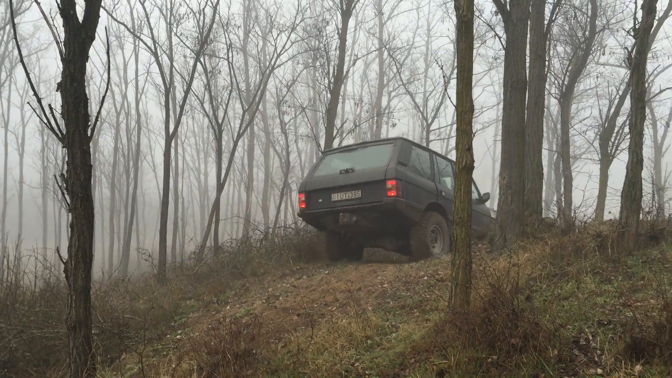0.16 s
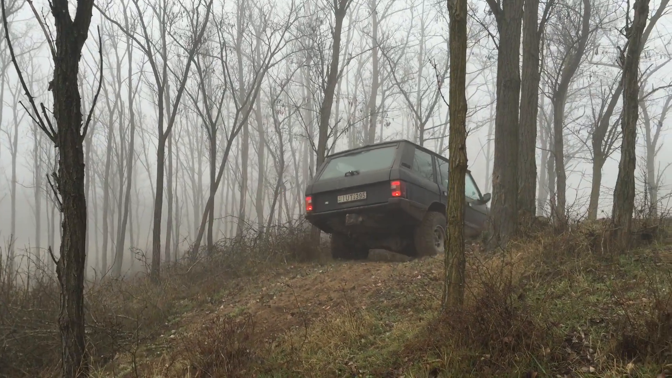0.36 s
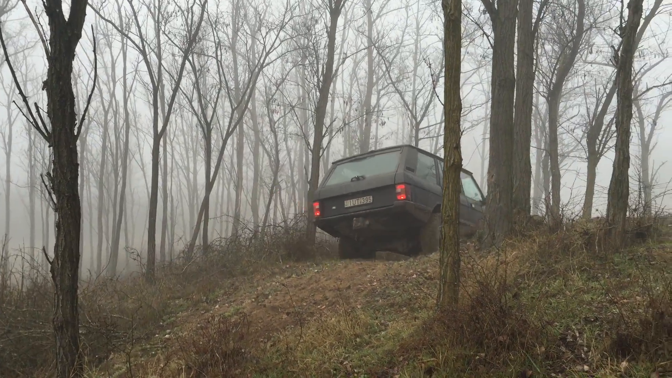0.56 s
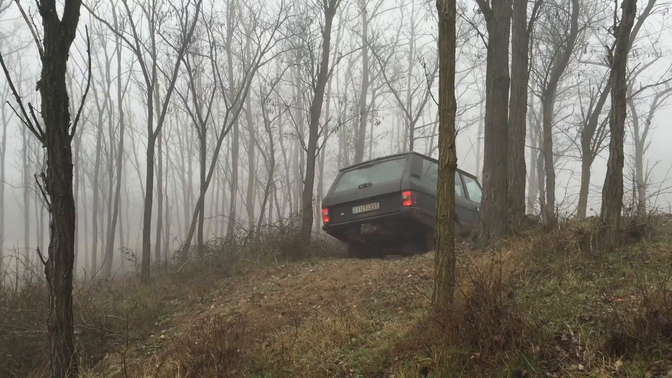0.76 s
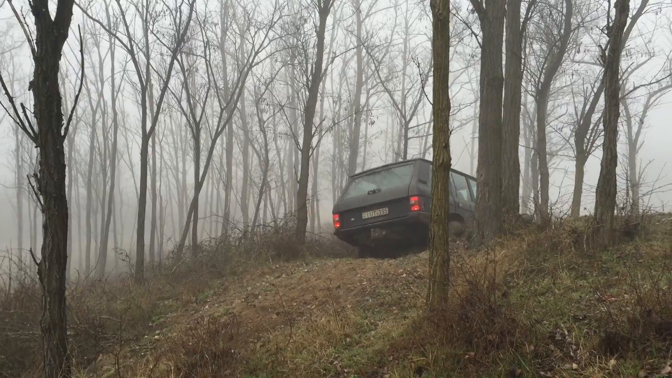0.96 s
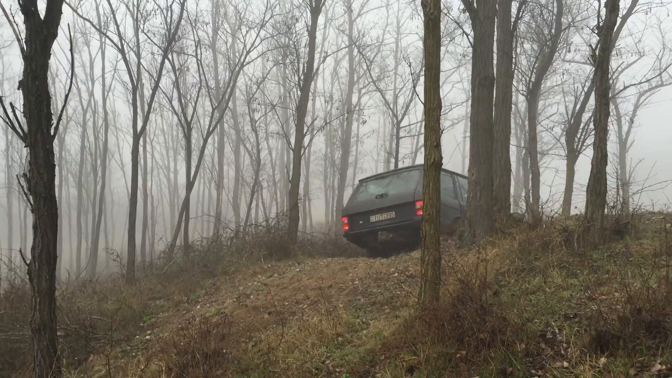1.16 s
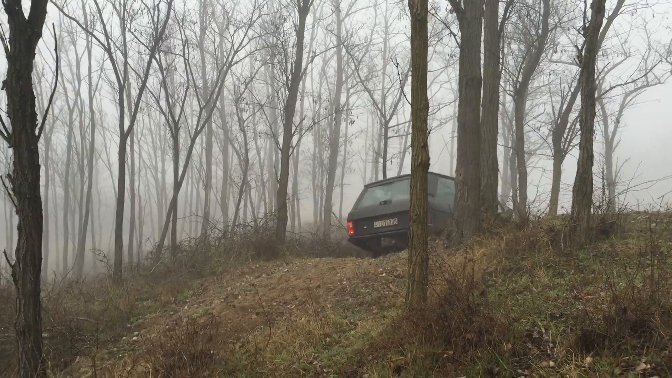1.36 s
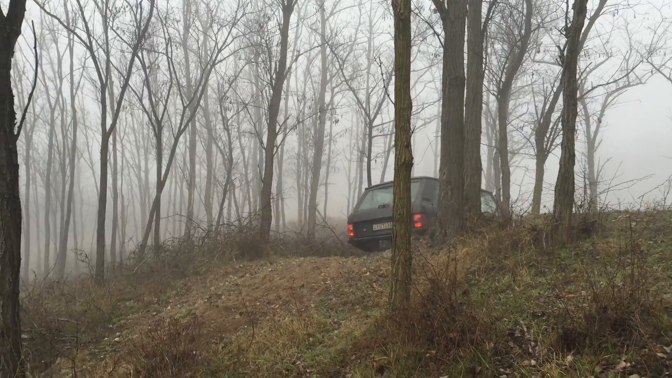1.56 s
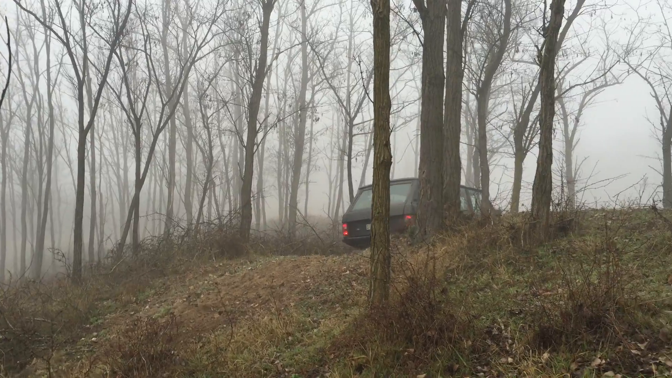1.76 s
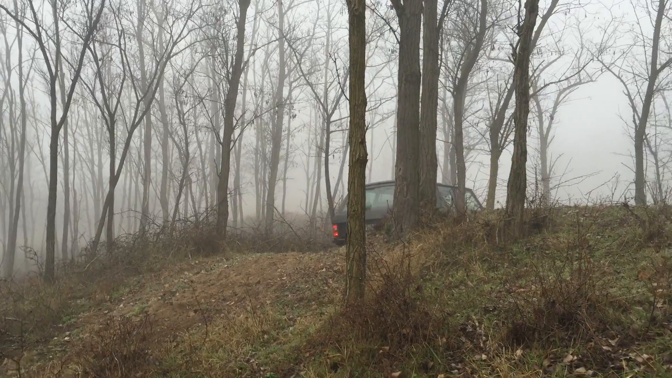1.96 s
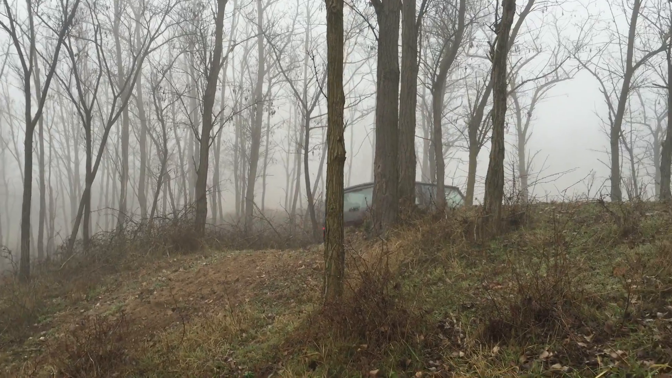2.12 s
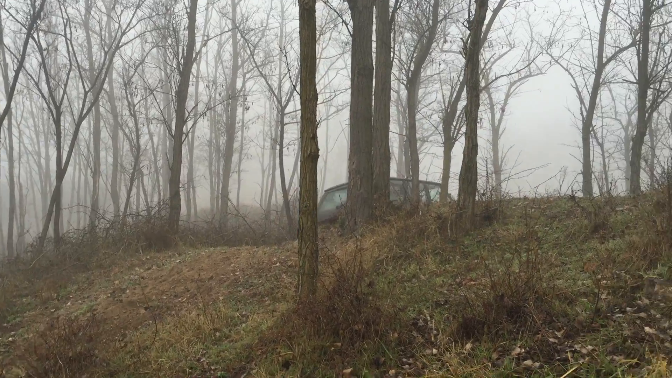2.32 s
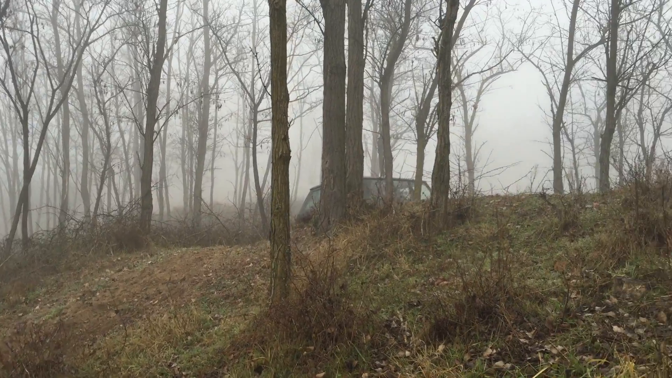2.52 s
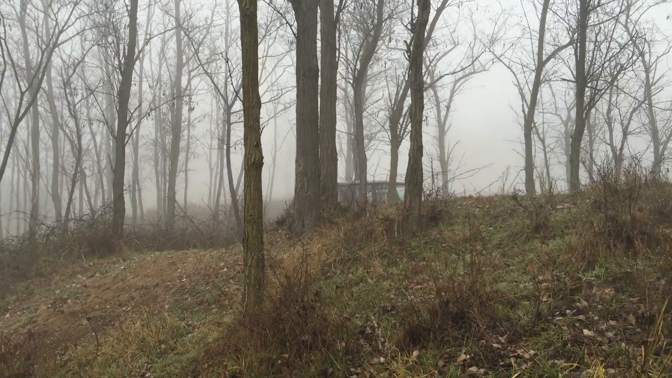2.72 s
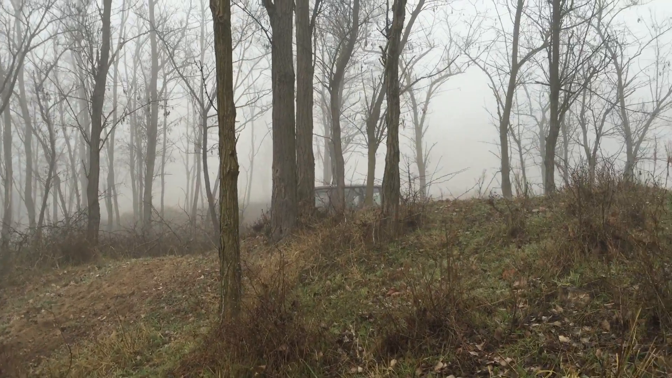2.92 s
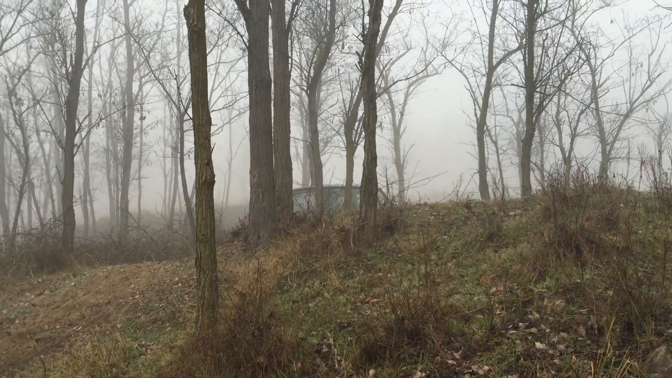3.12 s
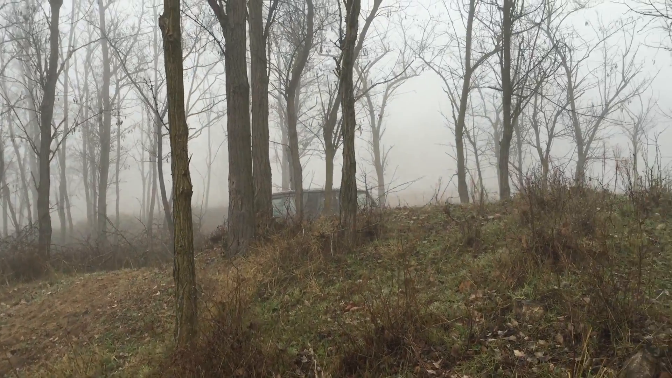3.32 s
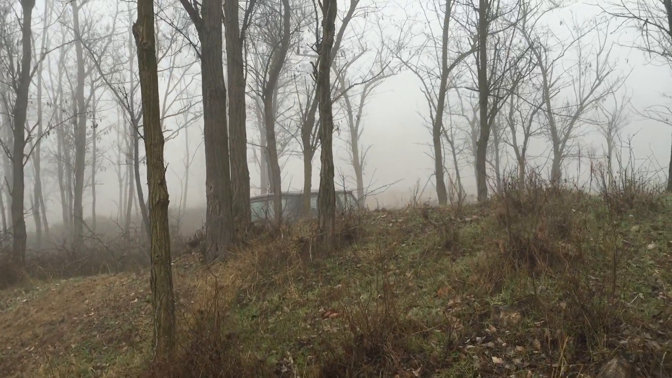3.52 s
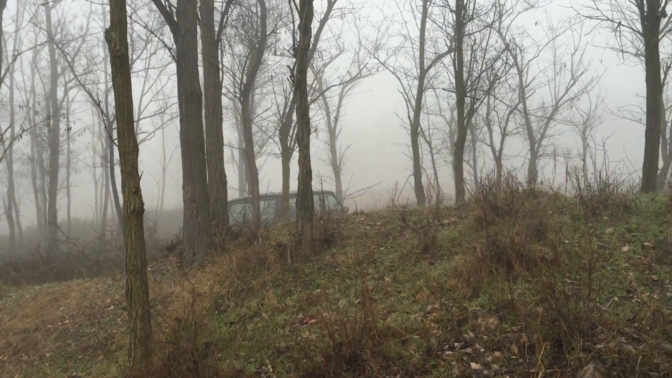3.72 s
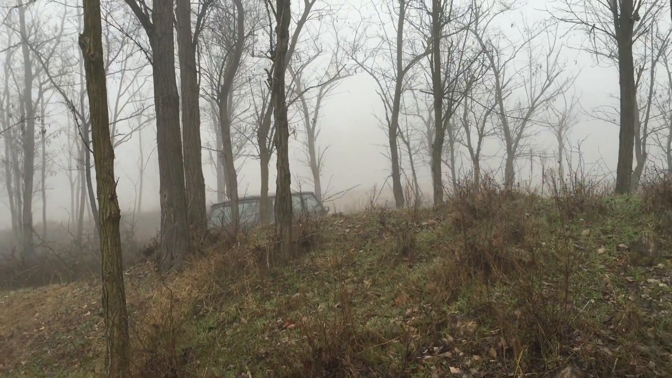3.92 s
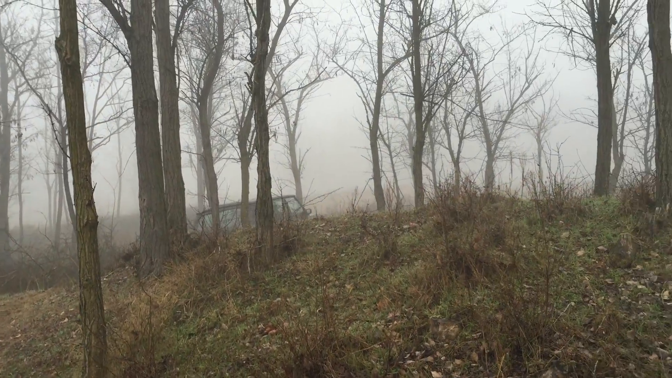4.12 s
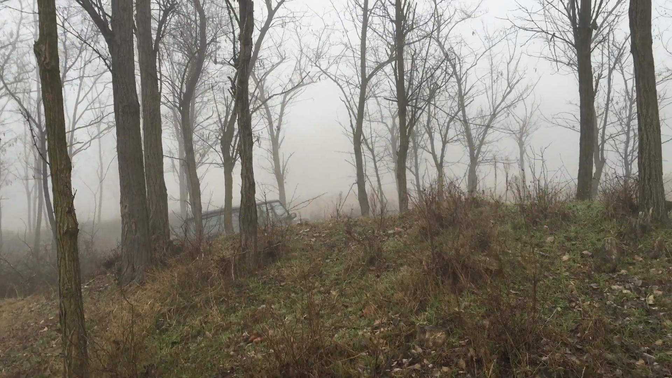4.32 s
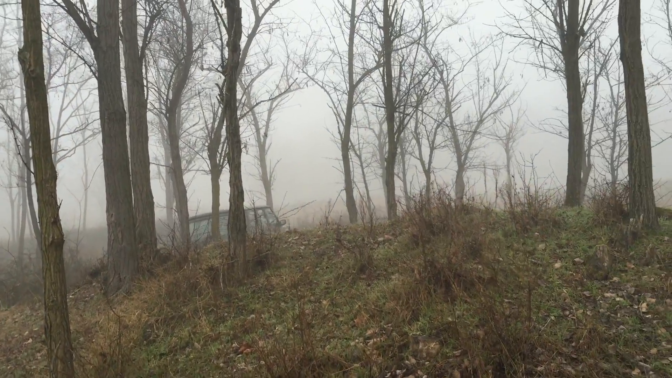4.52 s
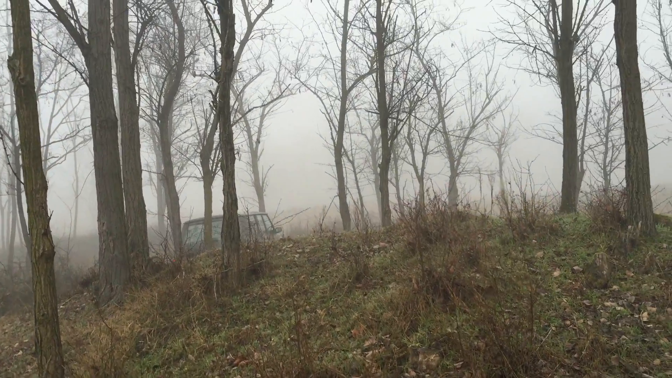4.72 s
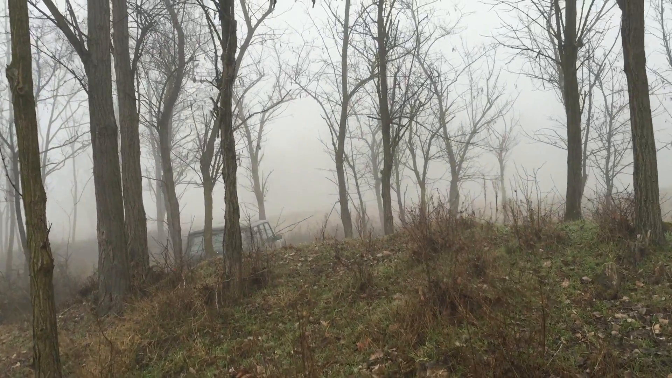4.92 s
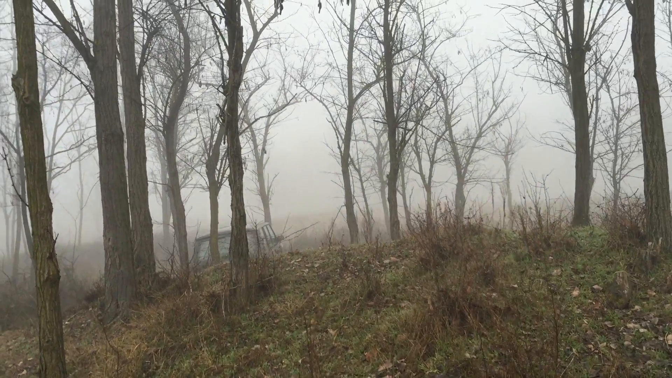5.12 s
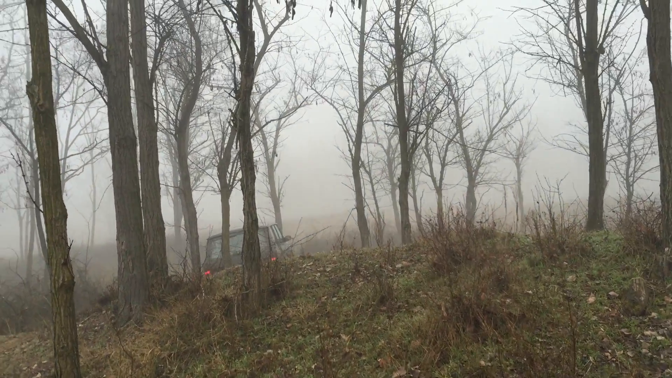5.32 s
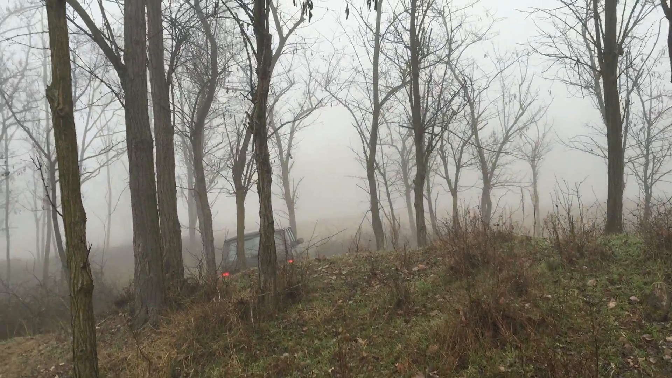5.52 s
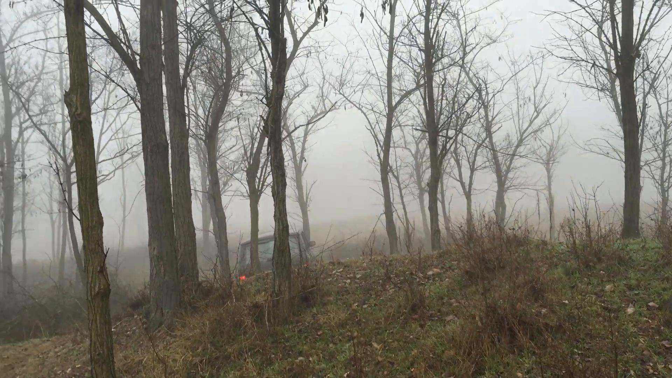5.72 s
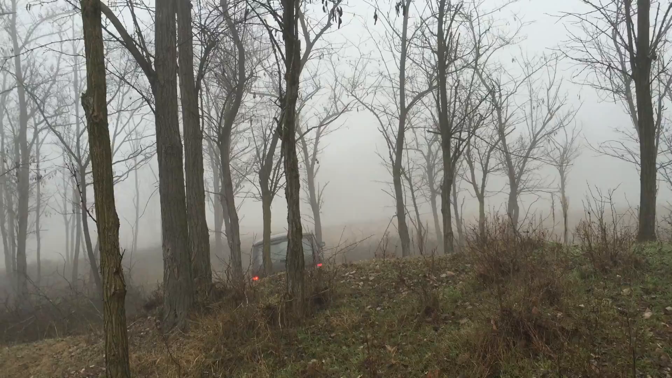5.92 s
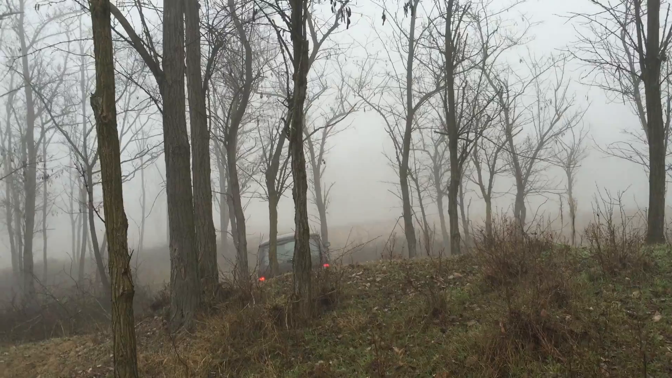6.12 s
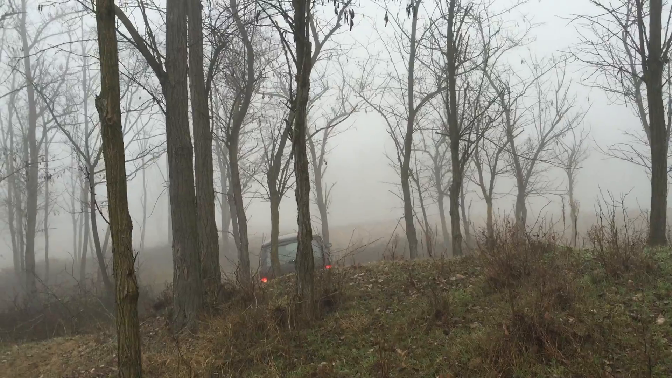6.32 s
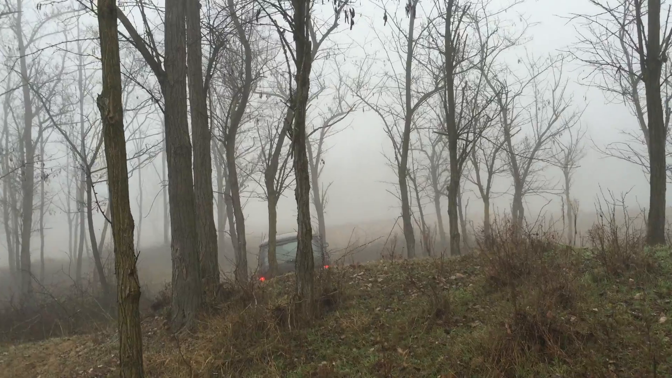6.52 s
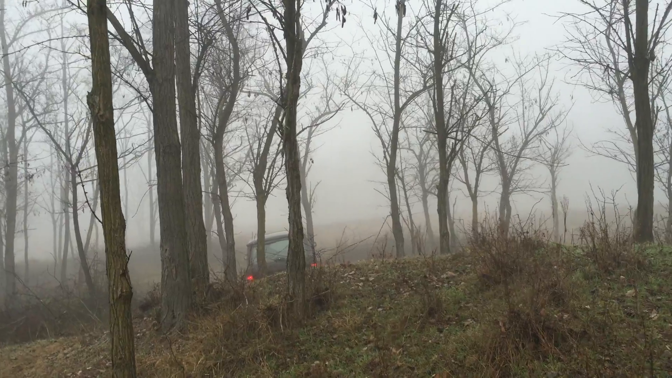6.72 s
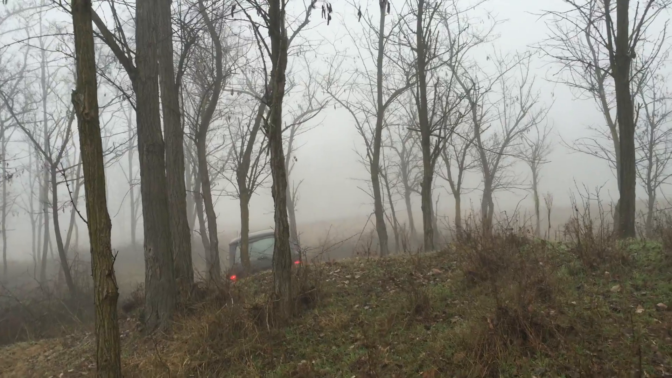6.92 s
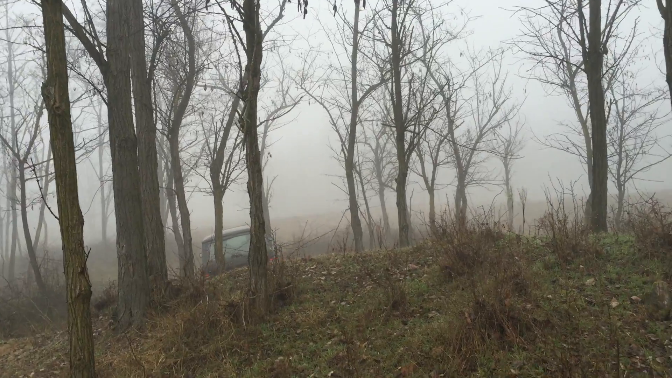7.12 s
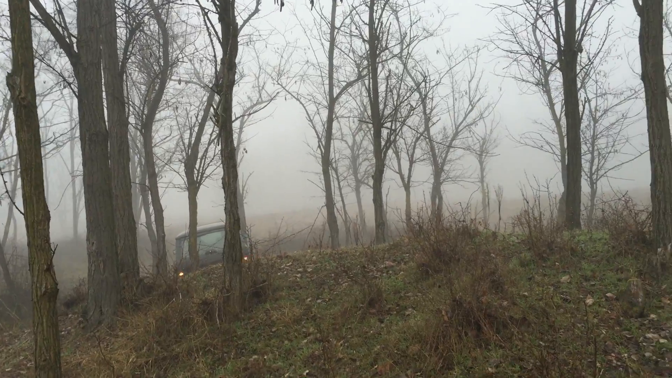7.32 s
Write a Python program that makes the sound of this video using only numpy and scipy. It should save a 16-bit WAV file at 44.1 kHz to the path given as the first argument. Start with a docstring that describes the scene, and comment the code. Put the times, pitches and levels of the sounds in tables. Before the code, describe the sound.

Throaty, lumpy engine surges uphill with squeaking belt and nearby leaf crunches, then drops to a muffled uneven idle, ending on a small rev.

```python
"""From a microphone near the leaf litter: a V8 truck pulls over a sandy woodland crest, belt squealing.
Uneven firing pulses thump through a filtered exhaust; noise grains close by rustle and crack as leaves and twigs.
The hill then screens the bay's ringing noise clatter and the belt's wavering tones, and the deep bass swells.
The truck idles away behind the crest over a faint woodland hiss, with sparse ticks, late faint squeals
and a small blip of the engine."""
import sys
import numpy as np
from scipy import signal
from scipy.fft import rfft, irfft
from scipy.io import wavfile

SR = 44100
rng = np.random.default_rng(int(sys.argv[2]) if len(sys.argv) > 2 else 0)


def transcribe(u):
    """Save the signal u as a 16-bit wav file named by the first command-line argument.

    u: samples, shape (n,) or (channels, n), limited to [-1, 1]; the rate is SR.
    q: integer samples, one column per channel.
    """
    v = np.clip(np.atleast_2d(u).T, -1, 1)
    q = np.round(v * 32767).astype(np.int16)
    wavfile.write(sys.argv[1], SR, q)


N = 324576  # samples
TIME = np.arange(N) / SR  # s

# The driver's effort: (time [s], engine load [0-1], exhaust level [dB])
DRIVE = [(0, 0.77, 5.5), (.3, 0.88, 1.7), (.8, 0.96, -1.9), (1.08, 0.61, 2.3), (1.75, 0.67, 0.8),
         (2.3, 0.29, 0.16), (3.1, 0.25, -0.6), (3.9, .09, -1.85), (4.5, 0.02, -0.07), (6.75, 0.01, -0.4),
         (7.05, 0.09, 3), (7.36, 0.24, -1)]
# Pull up the slope, second push at the crest, idle, small blip: (time [s], firing rate [1/s])
FIRING_RATE = [(0.0, 71.53), (0.35, 82.76), (0.78, 84.91), (1.11, 67.18), (1.72, 73.84), (2.15, 64.62),
               (2.67, 65.67), (2.79, 63.45), (3.6, 60.55), (4.61, 58.48), (4.89, 59.98), (5.24, 58.63),
               (6.13, 57.38), (6.28, 58.76), (6.7, 57.1), (7.07, 62.55), (7.36, 60.61)]
# Pulse strength, a row per cylinder in firing order: (idle [dB], light [dB], half [dB], full load [dB])
CYLINDER_DB = [(0, -3.5, 1, 6.5), (-2.5, -4, -7, -18.5), (-12.5, -2.5, -1.9, 6), (1.7, -7, 0, 7),
               (-2, -8.5, -0.5, 8), (-1.5, 0, 0, 5), (1.2, -2.5, -0.7, 6.5), (2.5, -4.5, 3, 5.5)]
# Pulse arrival at the tailpipe against even firing, same rows:
# (idle [ms], light [ms], half [ms], full load [ms])
CYLINDER_LAG = [(-2, 1.66, -0.26, -0.17), (-3, 4.5, 2.5, 0.27), (-3.5, 3.83, 0, 0.25),
                (-2.5, 3.87, -0.64, -1.72), (-2, 0.8, -0.8, -0.11), (-2, 2.34, 0.17, -0.47),
                (-2.24, 3, 0.92, 0.37), (-3, 2.86, 0.81, 0.96)]
# Exhaust and silencer response: (frequency [Hz], idle [dB], light [dB], half [dB], full load [dB])
EXHAUST = [(29.3, -34.5, -26.5, -35, -45), (44.3, -16.5, -22, -18.5, -12), (58.95, -6, -1, -1, 10.5),
           (80.3, -12, 4.5, -7.5, -11.5), (103, -1.5, -2, -6.5, -3), (117.5, -7.5, -3, -3, -10.5),
           (145.3, -12.5, -4, -8, -13), (172.8, -21.5, -17, -1.5, -1.1), (204.5, -16.5, -19.5, -18, -12),
           (242.6, -31, -47.5, -30.5, -22.5), (293, -41, -38.5, -33, -33.5), (318, -61, -34, -32, -24),
           (382.6, -61.5, -44, -48, -47.5), (620, -80, -78.5, -68.5, -77.5)]
# Exhaust harmonics that sing out:
# (multiple of the eight-firing cycle [-], idle [dB], light [dB], half [dB], full load [dB])
SINGING = [(23, -56.5, -46, -65.5, -67), (26, -54.5, -48.5, -62.5, -58.5), (29, -51.5, -69.5, -65.5, -45.5),
           (31, -61, -67.5, -55, -53.5), (37, -62.5, -62.5, -73, -82)]
# Unsteady gas flow at the tailpipe, relative spectrum: (frequency [Hz], density [dB per Hz])
FLOW = [(25, -8.5), (50, -15.5), (90, -10), (170, 2.5), (240, -2.5), (320, -8.5), (400, -39.5),
        (600, -56.5), (1200, -59)]
# Deepest bass of the exhaust, swelling for a while behind the hill: (time [s], level [dB])
BOOM = [(0, -3), (2.6, 0.25), (3.3, 3.5), (4.0, 3.5), (4.5, 0.6), (6.5, -0.6), (7.1, -0.5)]
# Engine-bay clatter, relative spectrum: (frequency [Hz], density [dB per Hz])
BAY = [(260, -11.5), (450, 2.5), (517, -6), (689, 5), (734, -1), (885, -4.5), (1500, -9), (1640, -4),
       (1790, -8), (2540, -5), (3020, -13), (3390, -17.5), (3650, -5), (6180, -20), (9000, -22),
       (11700, -40.5), (19800, -120)]
# Ringing metal in the engine bay: (frequency [Hz], width [Hz], relative level [dB])
BAY_MODES = [(678, 5.8, -25), (959, 43, -13.5), (1714, 29, -23), (2090, 510, -12), (3070, 190, -27)]
# Pitches at which belt and pulleys squeak: (frequency [Hz], relative level [dB])
SQUEAKS = [(2180, 1), (2620, 1), (2760, -7.5), (2910, 1.5), (3030, 0.5), (3280, -3), (3700, -5.5)]
# Longer belt squeals, each warbling about one pitch:
# (start [s], length [s], frequency [Hz], level before throb [dB])
SQUEALS = [(.02, 0.36, 2980, -50.5), (0.013, 0.17, 2670, -50), (0, 0.24, 2300, -59.5),
           (.22, 0.37, 3670, -58.5), (0.443, 0.5, 2150, -53), (1.285, 0.18, 2205, -60),
           (1.5, .22, 2620, -70.5), (6.144, 0.09, 2900, -67), (6.267, .08, 2650, -68.5),
           (6.424, 0.061, 2860, -67.5)]
# Rustling spells close by:
# (start [s], rise [s], length [s], level before the leaves' common gain [dB], brightness [dB per octave])
RUSTLES = [(0.194, .09, 0.49, -56, 3), (0.672, 0.017, 0.2, -46.5, 0.1), (0.905, 0.0084, 0.2, -51.5, -0.1),
           (1.145, .05, 0.37, -69, 3), (1.652, 0.13, 0.18, -55.5, 2), (1.843, 0.017, 0.091, -51.5, 0.2),
           (6.618, .02, 0.3, -72.5, 3)]
# Dry leaves, relative spectrum before brightness: (frequency [Hz], density [dB per Hz])
LEAVES = [(240, -3.5), (400, 5.5), (510, -4.5), (690, -8.5), (816, -17), (964, -5.5), (1310, -7.5),
          (1770, -1), (3050, -0.5), (5680, -6.5), (7350, -11.5), (8960, -13.5), (15000, -22.5)]
# Crunches and ticks of leaves and twigs:
# (time [s], level [dB], centre [Hz], spread [octaves], t60 [s], opening snap over the rest [dB])
CRACKS = [(.106, -48.5, 7100, 1.8, 0.041, -8), (.107, -47.5, 900, .7, .06, -10),
          (.379, -51, 7200, 1.1, 0.13, -3), (.472, -46, 2000, 2.3, 0.12, -12),
          (0.676, -42.5, 4970, 1.1, 0.093, 6), (.724, -36.5, 3180, 1.23, 0.16, 1),
          (.741, -32.5, 2780, 1, 0.047, -9), (0.932, -34, 3770, 0.68, 0.04, -5),
          (1.030, -36.5, 3680, 0.95, 0.18, 7), (1.558, -59.5, 8100, 1.3, 0.23, -4),
          (1.782, -47, 4200, 1.4, 0.058, 14), (1.858, -42.5, 4300, 1, 0.29, 18),
          (1.866, -47.5, 760, 1.1, 0.26, -10), (2.970, -60.5, 11600, 0.85, .02, 17),
          (3.851, -56, 603, 0.4, 0.045, -8), (4.298, -62.5, 12500, 0.5, .03, 2),
          (4.365, -66, 12000, 0.85, .02, 7), (4.395, -53.5, 7440, 1.5, .02, 15),
          (4.93, -49, 1500, 0.44, 0.067, -2), (4.935, -60, 2580, 0.68, 0.13, 0),
          (4.968, -62.5, 2280, 0.67, 0.13, -7), (5.096, -60, 5760, 1.1, 0.034, 5),
          (6.626, -56.5, 5460, 0.27, 0.028, 8), (6.642, -57, 4280, 0.72, 0.18, -8),
          (6.785, -62.5, 2494, 1.2, 0.17, -20), (6.861, -60, 4400, 0.7, 0.022, 2),
          (6.939, -57.5, 4600, .5, 0.019, 0), (6.995, -60, 1600, 0.63, 0.26, -20),
          (7.014, -59, 845, 1.2, 0.43, -19)]
# Woodland hiss, relative spectrum: (frequency [Hz], density [dB per Hz])
WOODS = [(240, -25), (420, 1), (520, -1), (720, -4), (930, 0), (1300, -6), (2700, -6), (3400, -10),
         (6000, -13), (9500, -16), (10500, -19), (15000, -19)]

SCREENED_FROM_S, HIDDEN_S = 0.45, 2.6  # the crest starts to screen the engine bay, then hides it wholly
SETTLE_DB_PER_S = 159  # the leaves fall quiet after each spell
TILT_ABOUT_HZ = 3000  # pivot of the leaves' brightness
WOODS_DB = -69.5  # mean level in dB, before slow swells and flicker
EDGE_HZ = 15370  # upper band limit of the recorder


def exhaust(pulse_db=30, scatter_db=0.84, jitter_ms=0.12, flow_db=-49, flow_load_db=7):
    """One pulse a firing; unequal cylinders make the lope, and load changes their pattern and the pipe's colour."""
    (load, shares), count = load_shares(), firings()
    fired_at = np.flatnonzero(np.diff(np.floor(count), prepend=-1))
    cylinder = np.arange(len(fired_at)) % len(CYLINDER_DB)
    chance = rng.standard_normal((len(fired_at), 2))
    shares_at = shares.T[fired_at]
    db = (np.array(CYLINDER_DB)[cylinder] * shares_at).sum(1) + scatter_db * chance[:, 0]
    lag_ms = (np.array(CYLINDER_LAG)[cylinder] * shares_at).sum(1) + jitter_ms * chance[:, 1]

    # each pulse is split between two samples to place it finely
    place = np.clip(fired_at + lag_ms * SR / 1000, 0, N - 2)
    whole, part = place.astype(int), place % 1
    pulses = np.bincount(whole, gain_of(db) * (1 - part), N)
    pulses = pulses + np.bincount(whole + 1, gain_of(db) * part, N)
    # a valve takes about a millisecond to release its gas, so the pulses have no sharp edge
    release = np.hanning(SR // 1000)
    pulses = np.convolve(pulses, release / release.sum(), "same")
    thumps = sum(share * signal.oaconvolve(pulses, pipe(k + 1))[:N] for k, share in enumerate(shares))

    cycles = count / len(CYLINDER_DB)
    lines = np.zeros(N)
    for order, *dbs in SINGING:
        tone = np.sqrt(2) * np.sin(2 * np.pi * round(order) * cycles)
        lines += gain_of(np.array(dbs) @ shares) * tone
    flow = gain_of(flow_db + flow_load_db * load) * coloured(rng.standard_normal(N), FLOW)
    return gain_of(curve(DRIVE, column=2)) * (gain_of(pulse_db) * thumps + lines + flow)


def firings():
    """Count of cylinder firings so far, the running sum of the firing rate."""
    return np.cumsum(curve(FIRING_RATE)) / SR


def load_shares():
    """Engine load, and its blend of the states from idle to full; the shares sum to 1."""
    load = np.clip(curve(DRIVE), 0, 1)
    states = np.shape(CYLINDER_DB)[1]
    steps = np.linspace(0, 1, states)
    return load, np.array([np.interp(load, steps, row) for row in np.eye(states)])


def pipe(column, size=16384):
    """Causal, minimum-phase response of the exhaust to one pulse, at one load."""
    hz = abs(np.fft.fftfreq(size, 1 / SR))
    log_gain = np.log(gain_of(read(EXHAUST, hz, column)))
    return np.fft.ifft(np.exp(np.conj(signal.hilbert(log_gain)))).real[:size // 2]


def ground(x, boom_hz=92):
    """The changing path over the ground scales the bass alone."""
    hz = np.fft.rfftfreq(N, 1 / SR)
    bass = irfft(rfft(x) / (1 + (hz / boom_hz) ** 10), N)
    return x + (gain_of(curve(BOOM)) - 1) * bass


def engine_bay(level_db=-53, screen_db=-24.5, hiss_db=-2, turn_db=2.0, flutter_db=4.0):
    """Clatter that swells once a crank turn, part of it ringing in the metal."""
    turns = firings() / 4  # four firings a crank turn
    swell_db = turn_db * np.cos(2 * np.pi * turns) + flutter_db * wander(80)
    clatter = rng.standard_normal(N) * gain_of(swell_db)
    rings = np.zeros(N)
    for hz, width, db in BAY_MODES:
        rings += gain_of(db) * evened(signal.lfilter(*signal.iirpeak(hz, hz / width, SR), clatter))
    return gain_of(level_db + screen_db * screened()) * (gain_of(hiss_db) * coloured(clatter, BAY) + rings)


def screened():
    """How far the hill hides the engine bay: 0 in plain view, 1 behind the crest."""
    return np.clip((TIME - SCREENED_FROM_S) / (HIDDEN_S - SCREENED_FROM_S), 0, 1)


def belt(level_db=-58, screen_db=-23, fitful_db=8.0, turn_db=5):
    """Thin wavering squeaks that catch and let go, pushed once a crank turn."""
    turns, out = firings() / 4, np.zeros(N)
    for hz, db in SQUEAKS:
        push_db = turn_db * np.cos(2 * np.pi * (turns + 0.34))
        grip_db = fitful_db * np.minimum(wander(10), 1.5) + push_db
        out += gain_of(db + grip_db) * wavering(hz, 0.014, 110)
    return gain_of(level_db + screen_db * screened()) * evened(out)


def squeals(turn_db=5, rough_db=3.0, lead_turns=0.32):
    """Longer slips of the belt: a warbling tone that swells and fades, throbbing once a crank turn."""
    turns, out = firings() / 4, np.zeros(N)
    throb_db = turn_db * np.cos(2 * np.pi * (turns + lead_turns)) + rough_db * wander(80)
    for s, length, hz, db in SQUEALS:
        arch = np.sqrt(np.maximum(1 - (2 * (TIME - s) / length - 1) ** 2, 0))
        out += gain_of(db) * arch * wavering(hz, 0.02, 150)
    return evened(gain_of(throb_db)) * out


def whine(hz=684, level_db=-59, fade_s=.36, rough_db=4):
    """A thin wavering whine from the engine bay that fades away, at half amplitude by fade_s."""
    tone = np.sqrt(2) * wavering(hz, 0.022, 60)
    return gain_of(level_db + rough_db * wander(40)) * tone / (1 + (TIME / fade_s) ** 4)


def leaves(level_db=2, grains_per_s=1800, size_db=3.0, hiss=0.74, clump_db=1.7):
    """Dense tiny fractures of dry leaves, in clumps; each spell has its own brightness."""
    sizes = gain_of(size_db * np.minimum(rng.exponential(1, N), 5)) * rng.choice([-1, 1], N)
    grains = evened(sizes * (rng.random(N) < grains_per_s / SR)) + hiss * rng.standard_normal(N)
    crackle = rfft(coloured(grains * gain_of(clump_db * wander(24)), LEAVES))
    octaves = np.log2(np.maximum(np.fft.rfftfreq(N, 1 / SR) / TILT_ABOUT_HZ, 1 / 10))
    out = np.zeros(N)
    for *spell, tilt in RUSTLES:
        out += rustling(*spell) * evened(irfft(crackle * gain_of(tilt * octaves), N))
    return gain_of(level_db) * out


def rustling(s, rise, length, db):
    """Stir of the leaves in one spell: it rises, holds and settles."""
    settle_db = SETTLE_DB_PER_S * np.maximum(TIME - s - length, 0)
    return gain_of(db - settle_db) * np.clip((TIME - s) / rise, 0, 1) ** 2


def cracks(grit_db=1.5, snap_s=0.00023):
    """A sharp snap and a gritty burst that dies away, in a band set for what breaks."""
    out, t = np.zeros(N), np.arange(SR // 4) / SR  # each burst is cut off after 0.25 s
    hz = np.fft.rfftfreq(len(t), 1 / SR)
    for s, db, centre_hz, spread, t60, snap_db in CRACKS:
        noise, grit = rng.standard_normal((2, len(t)))
        band = 1 / (1 + (np.log2((hz + 1) / centre_hz) / spread) ** 2) ** 1.54
        burst = evened(irfft(rfft(noise * gain_of(grit_db * grit)) * band, len(t)))
        decay = np.exp(-np.log(1000) * t / t60)
        snap = gain_of(snap_db) * np.exp(-t / snap_s)
        add(out, s, burst * gain_of(db) * (decay + snap))
    return out


def woods(swell_db=0.2, flicker_db=0.33):
    """Faint, nearly steady hiss of the woodland, as coloured noise."""
    level_db = WOODS_DB + swell_db * wander(2.7) + flicker_db * wander(40)
    return gain_of(level_db) * coloured(rng.standard_normal(N), WOODS)


def gain_of(db):
    """Decibels to amplitude."""
    return 10 ** (np.asarray(db) / 20)


def evened(x):
    """Scales to rms 1."""
    return x / np.sqrt(np.mean(x ** 2) + 1e-20)


def curve(rows, column=1):
    """One column of a time table at every sample."""
    rows = np.asarray(rows)
    return np.interp(TIME, rows[:, 0], rows[:, column])


def read(points, hz, column=1):
    """One column of a spectrum on a log-frequency axis."""
    points = np.asarray(points)
    return np.interp(np.log(hz + 1), np.log(points[:, 0] + 1), points[:, column])


def coloured(x, points):
    """Filters x by a spectrum table, then sets rms 1."""
    gain = gain_of(read(points, np.fft.rfftfreq(N, 1 / SR)))
    return evened(irfft(rfft(x) * gain, N))


def wander(hz):
    """Random motion of rms 1, mostly below the given rate."""
    lowpass = 1 / (1 + (np.fft.rfftfreq(N, 1 / SR) / hz) ** 4)
    return evened(irfft(rfft(rng.standard_normal(N)) * lowpass, N))


def wavering(hz, depth, rate_hz):
    """Sine whose pitch wanders by a fraction of itself (depth, rms)."""
    return np.sin(2 * np.pi * np.cumsum(hz * (1 + depth * wander(rate_hz))) / SR)


def add(mix, s, sound):
    """Mixes a sound in at time s."""
    part = mix[max(round(s * SR), 0):][:len(sound)]
    part += sound[:len(part)]


def scene():
    """Truck, leaf litter and woodland at one microphone."""
    truck = ground(exhaust()) + engine_bay() + belt() + squeals() + whine()
    return (truck + leaves() + cracks() + woods())[None]


def record(dry):
    """The recorder's band limit, a linear-phase low-pass."""
    lowpass = signal.firwin(511, EDGE_HZ, window=("kaiser", 9), fs=SR)
    return signal.oaconvolve(dry, lowpass[None], "same")


dry = scene()
out = record(dry)
transcribe(out)
```